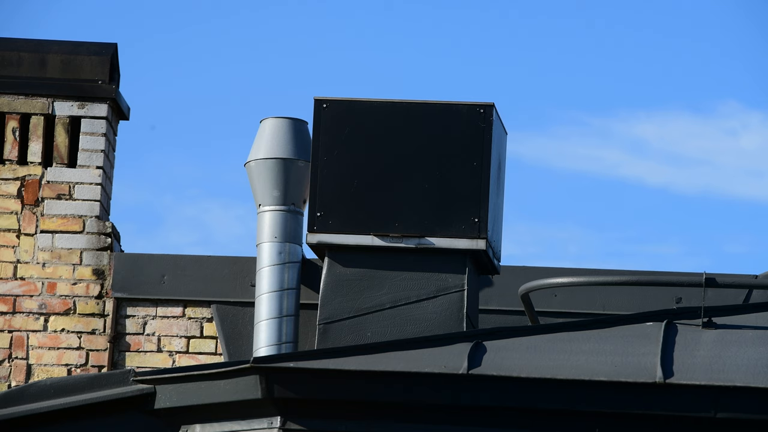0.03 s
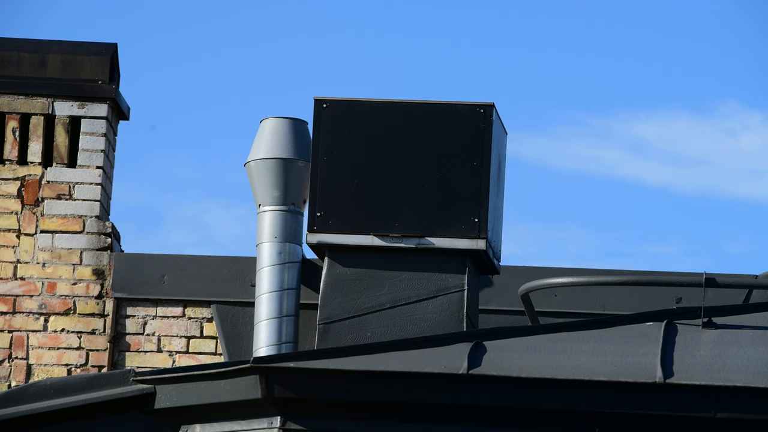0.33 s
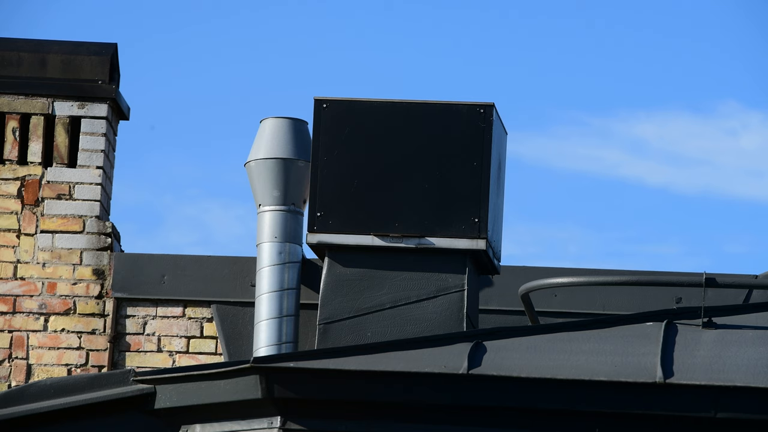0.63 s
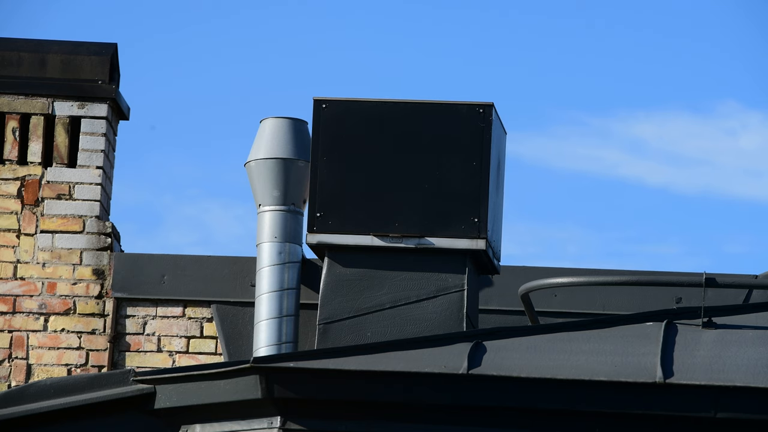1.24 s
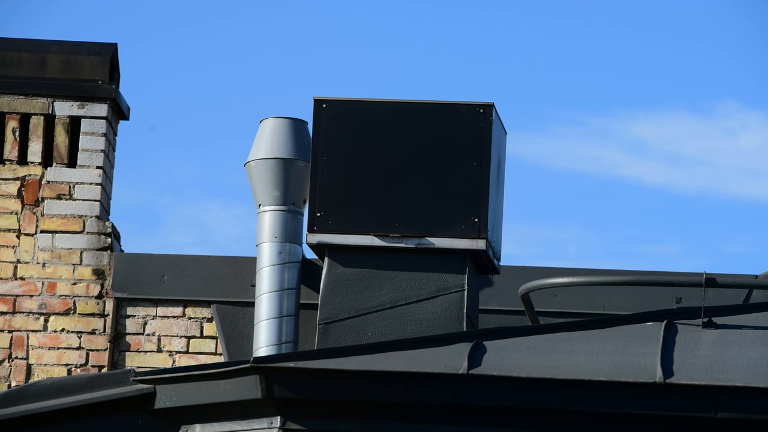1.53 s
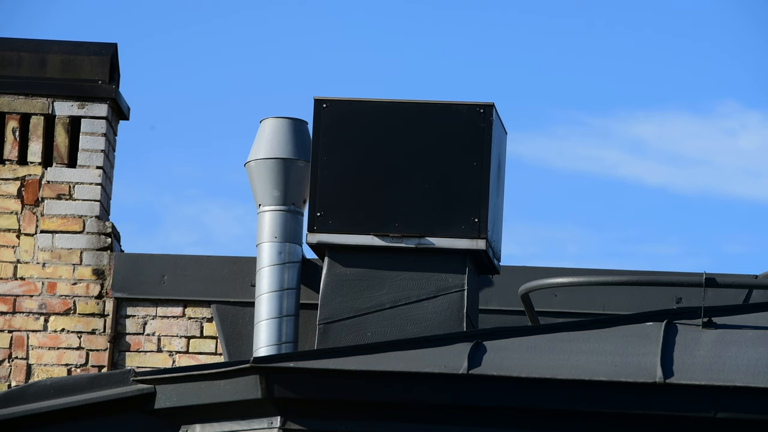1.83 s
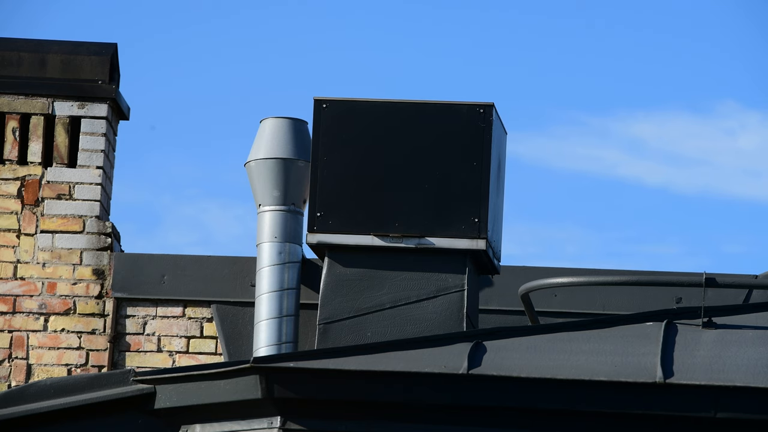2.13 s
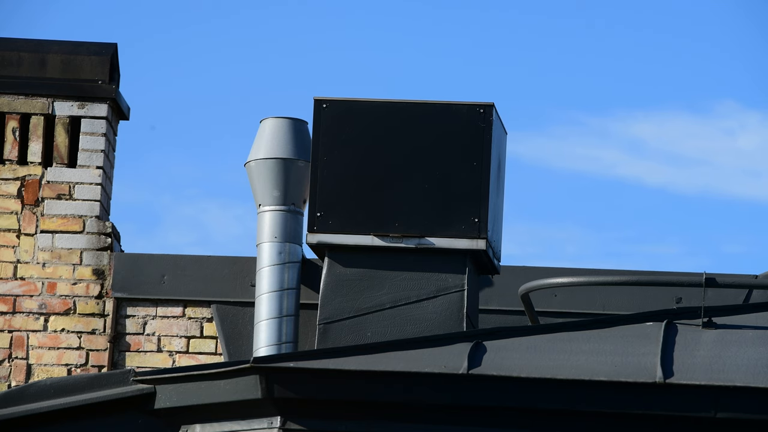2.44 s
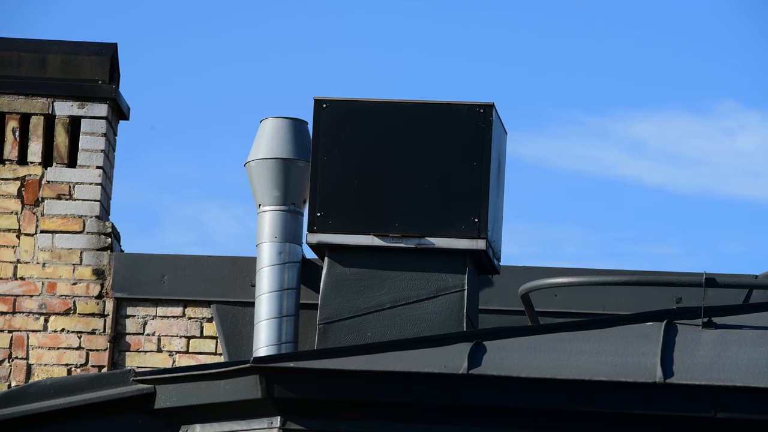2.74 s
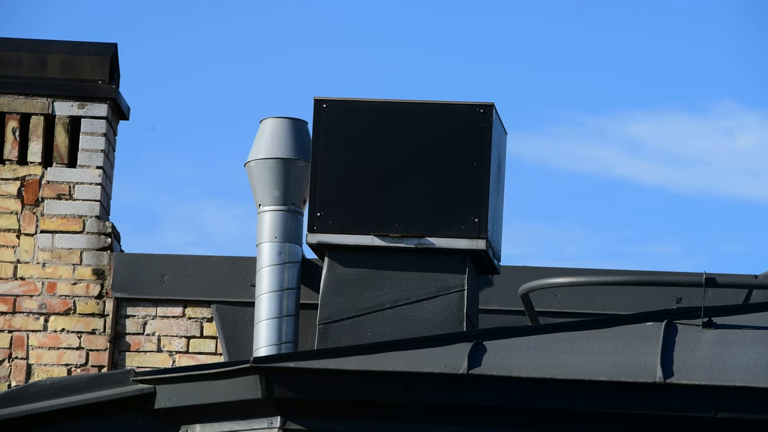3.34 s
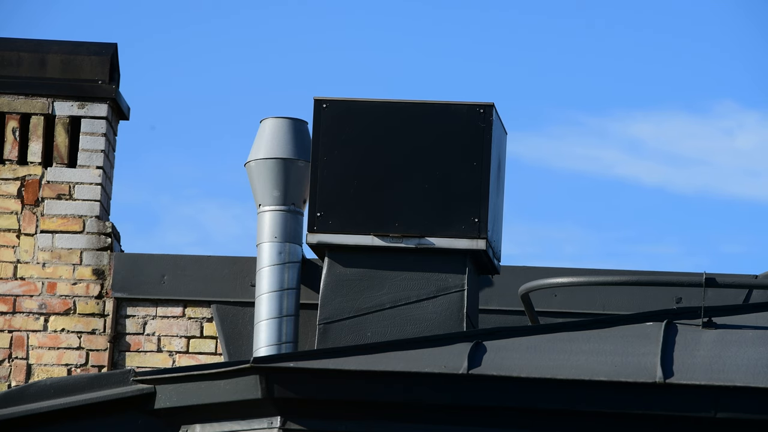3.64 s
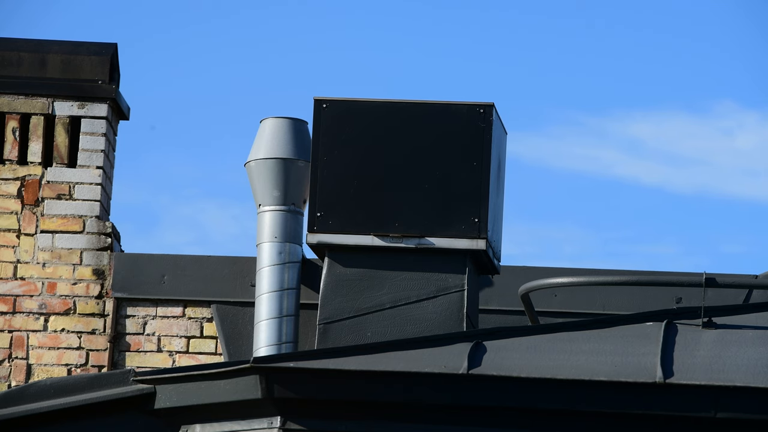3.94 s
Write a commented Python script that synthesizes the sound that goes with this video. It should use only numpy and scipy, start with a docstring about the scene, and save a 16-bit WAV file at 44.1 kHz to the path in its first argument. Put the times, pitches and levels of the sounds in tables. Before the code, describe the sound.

Something heavy rolls close by on a rooftop, rumbling and knocking hollowly over crunching grit. As it stops, steel clanks sharply further off, then again more softly. Ventilation and distant traffic hum underneath.

```python
"""Something heavy rolls close by on a rooftop, then stops. Its uneven contact shakes a hollow body
into rumbles and knocks, grit crunches under it, and a loose panel drones along.
Further off, a steel part clanks twice, with light touches between; the walls smear its ringing.
Ventilation and distant traffic hum underneath."""
import sys
import numpy as np
from scipy import signal
from scipy.fft import rfft, irfft
from scipy.io import wavfile
from scipy.ndimage import uniform_filter1d

SR = 44100
rng = np.random.default_rng(int(sys.argv[2]) if len(sys.argv) > 2 else 0)


def master(y):
    """Save y as 16-bit WAV."""
    cut = np.clip(np.atleast_2d(y).T, -1, 1)
    pcm = np.round(cut * 32767)  # scale
    wavfile.write(sys.argv[1], SR, pcm.astype(np.int16))


N = 176400
T, F = np.arange(N) / SR, np.maximum(np.fft.rfftfreq(N, 1 / SR), 1)


def undb(db):
    """Turn decibels into a number to multiply by."""
    return 10 ** (np.asarray(db) / 20)


def unit(x):
    """Scale to an average power of 1."""
    return x / np.sqrt(np.mean(x ** 2))


def over_hz(points, hz=F):
    """Read between (frequency, value) points, giving each octave equal room."""
    p = np.array(points)
    return np.interp(np.log(hz), np.log(p[:, 0]), p[:, 1])


def colour(x, points, peaks=()):
    """Shape a sound with a tone curve and resonances (pitches that stand out)."""
    lift_db = sum(db / (1 + (2 * (F - hz) / width) ** 2) for hz, width, db in peaks)
    gain = unit(undb(over_hz(points) + lift_db))
    # build a filter that rings only after the sound arrives
    cepstrum = irfft(np.log(gain), N)
    response = irfft(np.exp(rfft(2 * cepstrum[:N // 2], N) - cepstrum[0]), N)
    return signal.fftconvolve(x, response[None, :N // 8], axes=1)[:, :N]


def pan(left_db):
    """Left and right gains: positive leans left, negative leans right."""
    return undb(np.array([[left_db], [-left_db]]) / 2)


def stereo_noise(widths, left_db=0):
    """Noise for two ears: a shared part (mid) plus an opposite part (side) that widens it."""
    mid, side = rfft(rng.standard_normal((2, N)))
    width = undb(over_hz(widths))
    ears = np.array([mid + width * side, mid - width * side]) / np.hypot(1, width)
    return irfft(ears, N) * pan(left_db)


def wander(rate_hz):
    """A smooth random wobble with a typical size of 1."""
    step = max(int(SR / rate_hz), 2)
    stairs = np.repeat(rng.standard_normal(N // step + 1), step)
    return unit(uniform_filter1d(stairs, step)[:N])


def burst(start, decay):
    """Start suddenly, then die away."""
    return (T >= start) * np.exp(-np.maximum(T - start, 0) / decay)


def swell(age, rise_s, ring_s):
    """Echoes build up, then fall by 60 dB every ring_s seconds."""
    age = np.maximum(age, 0)
    return (1 - np.exp(-age / rise_s)) * np.exp(-np.log(1000) * age / ring_s)


def wavering_tone(hz, flutter_hz, size=N):
    """One tone that wavers in each ear as it mixes with its own echoes."""
    steps = np.arange(size) / SR * flutter_hz
    a, b, c, d = (np.interp(steps, np.arange(1024), row) for row in rng.standard_normal((4, 1024)))
    echoes, echo_share = np.array([a + 1j * b, c + 1j * d]), 0.6
    phases = rng.uniform(0, 2 * np.pi) + np.array([[0], [rng.choice([-1, 1]) * np.pi / 2]])
    waver = np.sqrt(2 * (1 - echo_share)) * np.exp(1j * phases) + np.sqrt(echo_share) * echoes
    return unit((waver * np.exp(2j * np.pi * hz * T[:size])).real)


def roll_fade(stop_s=2.47, fade_s=0.28):
    """Full level while the load rolls, fading to silence as it stops."""
    return np.clip((stop_s - T) / fade_s, 0, 1)


# how loud the rolling is: t/s, rumble level/dB, rattle level/dB, grit level/dB
ROLL_LEVELS = [(.03, -56.5, -97, -98), (.055, -50.5, -58.5, -68), (.7, -53, -56.5, -70),
               (.74, -53, -55, -63.5), (1.03, -53.5, -54.5, -56.5), (1.16, -47.5, -47, -55.5),
               (1.3, -47, -47.5, -56.5), (1.45, -47, -46, -56.5), (1.68, -43, -43, -55.5),
               (1.85, -42, -47, -62), (2.02, -44.5, -52, -72), (2.2, -54, -58.5, -82), (2.4, -50, -58, -90)]
# stereo width of the rolling, ticks and scrapes: f/Hz, side level over mid/dB
ROLL_WIDTH = [(40, -15), (130, -34.5), (500, -10.5), (1200, -7), (2500, 0), (6000, 1.5)]
# tone curves of the three layers: f/Hz, level/dB
RUMBLE_TONE = [(25, -24.5), (50, -3.5), (75, -8.5), (95, -2.5), (118, 7), (132, -11.5), (147, 2),
               (175, -4.5), (215, -36.5), (265, -14.5), (400, -23), (900, -68.5)]
RATTLE_TONE = [(150, -15), (225, -2.5), (270, 4.5), (440, -6), (600, 0.5), (720, -3), (880, -2),
               (1100, -6.5), (1300, -3), (1780, -11), (2400, -6.5), (3000, -19.5), (5000, -24),
               (8000, -35.5), (16000, -55)]
GRIT_TONE = [(2000, -14), (4200, -1.5), (5200, -5), (6500, -6), (8500, -6), (10300, -1.5), (12300, -1.5),
             (13500, 0), (16000, -2.5)]
# low and higher resonances of the hollow body, then the grit's: f/Hz, width/Hz, boost/dB
BODY_LOW_PEAKS = [(120, 5.6, 5), (145.2, 11, 6.5)]
BODY_HIGH_PEAKS = [(301.4, 11, 5), (366.8, 10.3, 6), (515, 21, 5), (621, 26, 8), (830, 28, 7.5),
                   (965, 9.2, 8.5), (1944, 50, 11)]
GRIT_PEAKS = [(10200, 400, 2.5), (10500, 320, -5.5), (13700, 470, -3), (15200, 500, 2.5)]
def rolling():
    """Uneven contact shakes a hollow body: low rumble, rough rattle and fine grit."""
    times, *levels = np.array(ROLL_LEVELS).T
    low, mid, high = (undb(np.interp(T, times, db)) for db in levels)
    rumble = colour(stereo_noise(ROLL_WIDTH) * low, RUMBLE_TONE, BODY_LOW_PEAKS)
    rough = unit(undb(1.5 * wander(250) + wander(27.98)))
    rattle = colour(stereo_noise(ROLL_WIDTH, left_db=-1.5) * mid * rough, RATTLE_TONE, BODY_HIGH_PEAKS)
    crunch = unit(undb(wander(900) + 2 * wander(45.4)))
    grit = colour(stereo_noise(ROLL_WIDTH, left_db=-3.5) * high * crunch, GRIT_TONE, GRIT_PEAKS)
    return (rumble + rattle + grit) * roll_fade()


def panel_drone():
    """A loose panel hums unevenly until the rolling stops."""
    return undb(-59) * wavering_tone(hz=300, flutter_hz=14)[0] * roll_fade() ** 2


# tone curve of the background: f/Hz, level/dB
HUM_TONE = [(15, -46), (25, -4.5), (113, -4.5), (136, -7), (164, -4), (221, -15), (297, -10), (378, -16),
            (631, -15), (848, -17), (1110, -19), (1410, -21), (2060, -20), (2230, -22), (4040, -24.5),
            (4620, -25), (15500, -28.5)]
# resonances of the air ducts: f/Hz, width/Hz, boost/dB
DUCT_PEAKS = [(155.2, 25, 4), (310.6, 12, 6.5)]
# stereo width of the background: f/Hz, side level over mid/dB
HUM_WIDTH = [(40, -9), (150, -7), (400, -4), (1500, -3), (5000, 0.5)]
def traffic_and_ducts():
    """Distant traffic and humming air ducts make a nearly steady rush."""
    rush = stereo_noise(HUM_WIDTH) * undb(0.25 * wander(4.96))
    return undb(-56) * colour(rush, HUM_TONE, DUCT_PEAKS)


# bumps of the rolling load: t/s, level/dB
KNOCKS = [(.104, 2), (0.173, 4.5), (.216, 4), (0.314, 5.5), (0.358, -6), (.383, -0.5), (0.446, 3),
          (0.593, 7.5), (.634, 4), (0.661, 1), (.729, 4.5), (0.775, 4.5), (0.869, 3), (0.911, 1),
          (1.001, -1), (1.037, 4.5), (1.146, 3.5), (1.206, 4), (1.248, 0), (1.314, 4), (1.464, -5),
          (1.559, 0), (1.665, 12.5), (1.718, 9), (1.758, 9.5), (1.83, 14.5), (1.865, 2), (1.902, 4),
          (1.998, 2)]
def knocks(body_hz=128.3, width_hz=54):
    """Each bump swells and dies in the body's lowest resonance, at a slightly different pitch."""
    out = 0
    for start, db in KNOCKS:
        hz = body_hz * (1 + 0.022 * rng.standard_normal())
        age = np.maximum(T - start, 0)
        growth = np.pi * width_hz * age  # a wider resonance gives a shorter knock
        out += undb(db - 43) * growth * np.exp(1 - growth) * np.sin(2 * np.pi * hz * age)
    return out


# single cracks of grit: t/s, level/dB, decay/s
TICKS = [(.117, -59, .008), (.175, -58, .008), (.241, -54, 0.015), (0.334, -55, 0.0054), (.38, -58, 0.0073),
         (.451, -57, .008), (.52, -56, .008), (.592, -57, .008), (.727, -55, .02), (.752, -56, .015),
         (.817, -52, 0.0092), (.885, -51.5, 0.018), (.943, -50.5, 0.019), (1.126, -50, 0.016),
         (1.188, -55, .01), (1.431, -47, .012), (1.466, -42.5, 0.011), (1.616, -44.5, 0.0099)]
# their tone curve: f/Hz, level/dB
TICK_TONE = [(1000, -23), (2200, -22), (4000, -7), (8500, -12), (11000, -1.5), (13500, -6), (16000, -3)]
# their resonances: f/Hz, width/Hz, boost/dB
TICK_PEAKS = [(13730, 610, 10), (15200, 500, 5)]
def grit_ticks():
    """Grit cracks under the load in bright ticks to the right."""
    loudness = sum(undb(db) * burst(start, decay) for start, db, decay in TICKS)
    cracks = stereo_noise(ROLL_WIDTH, left_db=-5.5) * loudness
    rough = unit(undb(1.6 * wander(1200)))
    return colour(cracks * rough, TICK_TONE, TICK_PEAKS)


# tone curve of the snap: f/Hz, level/dB
SNAP_TONE = [(1000, -14), (2500, -12), (3400, -3), (5000, -6), (8000, -4), (12000, -6), (14500, 7),
             (16000, 5)]
def snap(start_s=0.2187):
    """One sharp click close by, with a very short rasp behind it."""
    click = undb(-17) * burst(start_s, decay=0.0006) * rng.standard_normal((2, N))  # the rasp
    click[:, int(start_s * SR)] += 1  # the sharp edge
    return undb(-18.5) * colour(click, SNAP_TONE) * pan(left_db=-2)


# brief scrapes and jolts, then a bright treble burst as each steel clank begins: t/s, level/dB, f/Hz, width/Hz,
# decay/s
SCRAPES = [(.24, -54.5, 1250, 300, .03), (.728, -54, 1000, 1500, 0.047), (1.108, -46.5, 595, 199, 0.036),
           (1.17, -47.5, 990, 1000, 0.039), (1.299, -46, 580, 150, 0.016), (1.361, -41, 610, 180, 0.016),
           (1.43, -41.5, 620, 147, 0.014), (1.466, -41.5, 2240, 445, 0.013),
           (1.655, -48.5, 1300, 1790, 0.044), (2.19, -64.5, 3850, 1400, 0.11),
           (2.456, -54, 14500, 3000, .04), (3.778, -56, 13900, 4000, .03)]
def scrapes():
    """Each scrape, jolt or clank's bright attack is a short burst of noise around one pitch."""
    rub = rfft(stereo_noise(ROLL_WIDTH, left_db=-0.5))
    out = 0
    for start, db, hz, width, decay in SCRAPES:
        band = irfft(rub / (1 + ((F / hz - hz / F) * hz / width) ** 2), N)
        out += undb(db) * unit(band) * burst(start, decay)
    return out


# thin rings of lightly touched metal: t/s, level/dB, f/Hz
PINGS = [(.73, -65, 4970), (.75, -62.5, 4200), (1.375, -61.5, 5040), (1.385, -59, 5920), (1.39, -60, 4170),
         (3.335, -62, 4160)]
def pings():
    """Each light touch sets metal ringing with a single rough tone."""
    out = 0
    for start, db, hz in PINGS:
        loudness = undb(db) * swell(T - start, rise_s=0.021, ring_s=0.6)
        out += loudness * wavering_tone(hz, flutter_hz=130.7)
    return out


# quick contacts within one clank: delay t/s, level/dB
CONTACTS = [(0, -3), (0.014, 0.5), (0.032, -3)]
# how long the echoes take to fall by 60 dB: f/Hz, t/s
ECHO_TIMES = [(200, 0.97), (1000, 0.8), (4000, 0.67), (6000, 0.64), (9000, 0.51), (16000, 0.1)]
def clank_echoes(age, hz):
    """Loudness of a clank at one pitch: the walls draw out each contact, and their powers add."""
    ring_s = over_hz(ECHO_TIMES, hz)
    echoes = [undb(db) * swell(age - delay, rise_s=0.01, ring_s=ring_s) for delay, db in CONTACTS]
    return np.sqrt(sum(echo ** 2 for echo in echoes))


# hits on the steel: t/s, level/dB, place struck (0 to 1), treble tilt/dB per octave
CLANKS = [(2.445, -1.5, 0.15, 0), (2.909, -28, 0.6, -6), (3.32, -27.5, 1, -4.5), (3.623, -24, 1, -3),
          (3.766, -9.5, 0.98, -1)]
# the steel's own tones: f/Hz, level/dB struck at place 0, level/dB struck at place 1
STEEL_TONES = [(313, -20, -7), (866, -19, -13), (1104, -9, -8), (1337, -20, -12), (1925, -9, -8),
               (1985, -16, -6), (2018, -19, -10), (2710, -13, -12), (3690, -14, -13), (3780, 1, -9),
               (3820, -7, -9), (3869, 1, -10), (3897, -7, -11), (4101, -8, -7), (4142, -2, -6),
               (4190, -12, -7), (4939, -2, -22), (5075, -12, -14), (5330, -15, -13), (5415, -7, -12),
               (5730, -7, -11), (5775, -7, -10), (5830, -14, -13), (5925, -16, -11), (6580, -18, -24),
               (7690, -16, -15), (7795, -15, -20), (8032, -17, -26), (8335, -17, -23), (8678, -17, -26),
               (9230, -19, -20), (10100, -19, -18), (10406, -15, -16), (11090, -15, -23), (12180, -18, -21),
               (13140, -20, -21), (13660, -19, -24), (14890, -17, -23)]
# tone curve of the clatter: f/Hz, level/dB
CLATTER_TONE = [(200, 0), (500, -3.5), (1100, 3), (2300, -3.5), (3100, -6), (4000, 5), (5600, 1.5),
                (7000, -6), (9000, -7), (12000, -1), (16000, -11)]
# crowds of weak resonances in the clatter: f/Hz, width/Hz, boost/dB
CLATTER_PEAKS = [(1940, 290, 6), (2733, 130, 10.5), (3780, 300, 9.5), (4030, 63, 6.5), (5100, 84, 7),
                 (5540, 220, 3), (5900, 300, 8), (7540, 390, 7), (10000, 400, 6), (12150, 250, 7)]
# stereo width of the clatter: f/Hz, side level over mid/dB
CLATTER_WIDTH = [(300, -37), (1100, -14), (2200, -23), (4000, 1), (9000, -0.5)]
def steel_clanks():
    """Struck steel rings with many tones and a noisy clatter; the highest die away first."""
    out, size = np.zeros((2, N)), N // 4
    age = T[:size]
    rough_noise = stereo_noise(CLATTER_WIDTH) * unit(undb(2.5 * wander(400)))
    clatter = rfft(colour(rough_noise, CLATTER_TONE, CLATTER_PEAKS))
    # split the clatter into octaves so that each can fade at its own speed
    octaves_hz = 125 * 2 ** np.arange(8)
    bands = [irfft(clatter * np.interp(np.log(F), np.log(octaves_hz), pick), N) for pick in np.eye(8)]
    for start, db, place, tilt_db in CLANKS:
        first = int(start * SR)
        parts = []
        for hz, db_at_0, db_at_1 in STEEL_TONES:
            strength = undb(db_at_0 + place * (db_at_1 - db_at_0))
            parts.append((hz, strength * wavering_tone(hz, flutter_hz=65, size=size)))
        for hz, band in zip(octaves_hz, bands):
            parts.append((hz, undb(1.5) * np.roll(band, -first, axis=1)[:, :size]))
        clank = sum(undb(tilt_db * np.log2(hz / 3000)) * clank_echoes(age, hz) * x for hz, x in parts)
        out[:, first:first + size] += undb(db - 43.5) * clank[:, :N - first]
    return out * pan(left_db=1.2)


def scene():
    """Add up the ringing metal, the sounds close by and the background hum."""
    metal = steel_clanks() + pings()
    close_by = rolling() + panel_drone() + knocks() + grit_ticks() + scrapes() + snap()
    return metal + close_by + traffic_and_ducts()


def record(dry):
    """The sound fades in quickly after a moment of silence; the highest treble is cut."""
    fade_in = np.clip((T - 0.036) / 0.006, 0, 1)
    treble_cut = signal.ellip(10, 0.2, 70, 15750, fs=SR, output="sos")
    return signal.sosfilt(treble_cut, dry * fade_in)


dry = scene()
out = record(dry)
master(out)
```